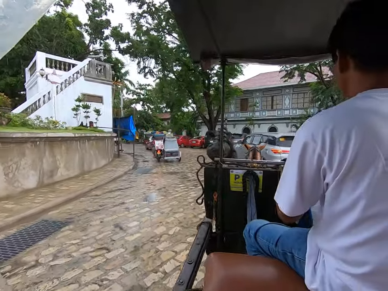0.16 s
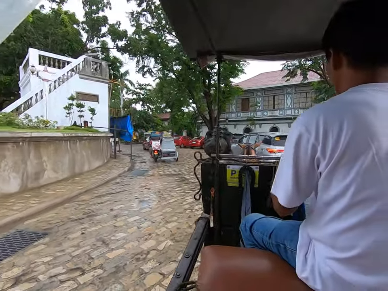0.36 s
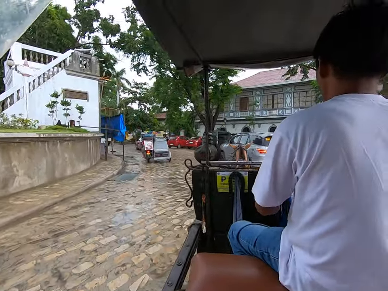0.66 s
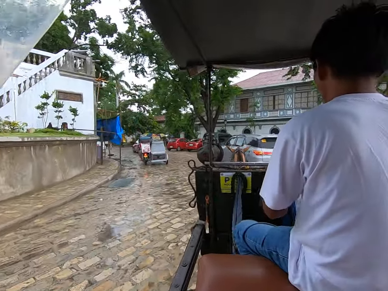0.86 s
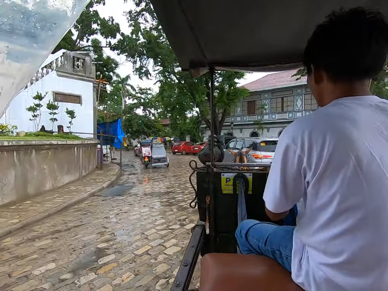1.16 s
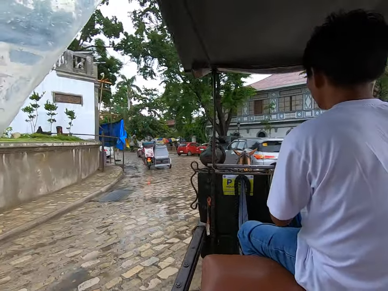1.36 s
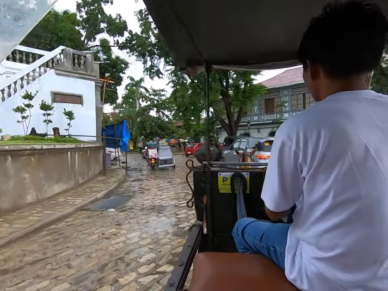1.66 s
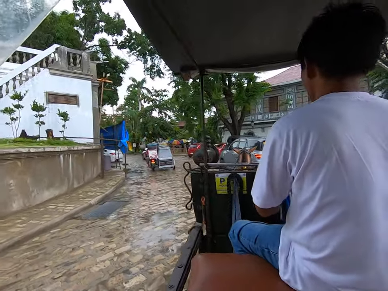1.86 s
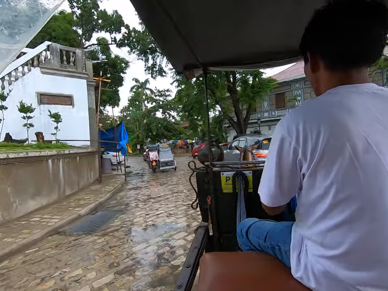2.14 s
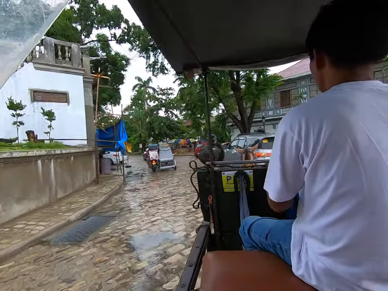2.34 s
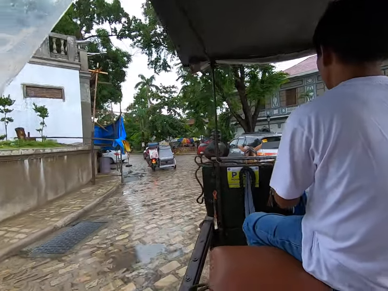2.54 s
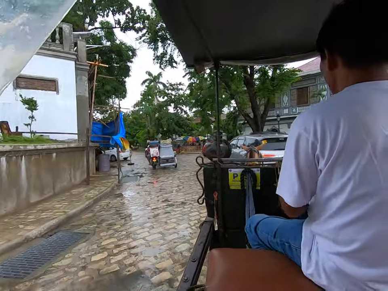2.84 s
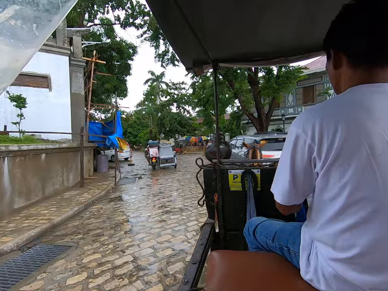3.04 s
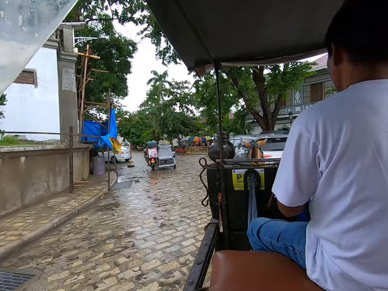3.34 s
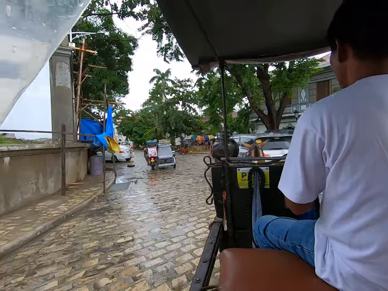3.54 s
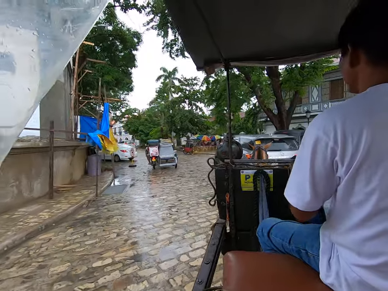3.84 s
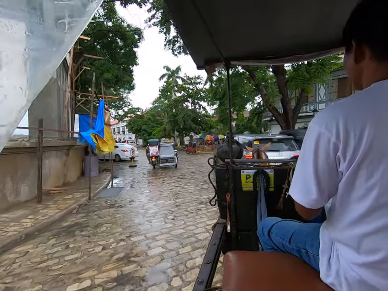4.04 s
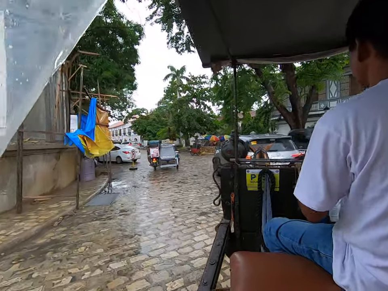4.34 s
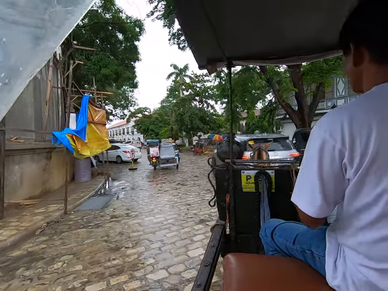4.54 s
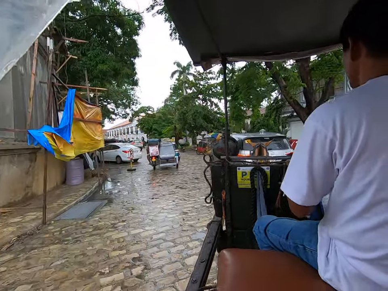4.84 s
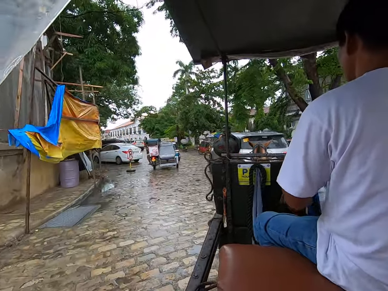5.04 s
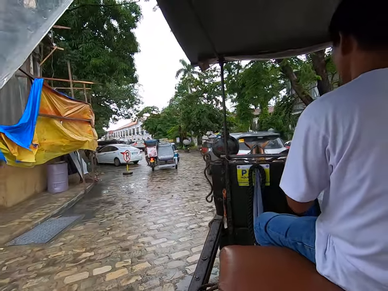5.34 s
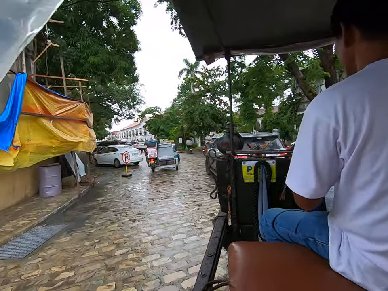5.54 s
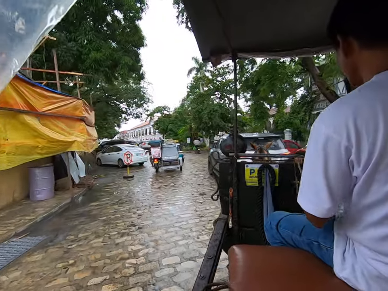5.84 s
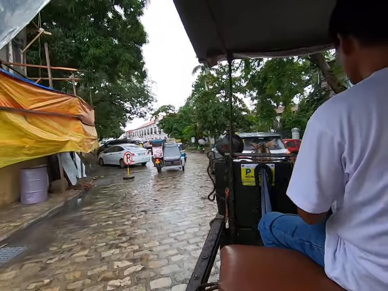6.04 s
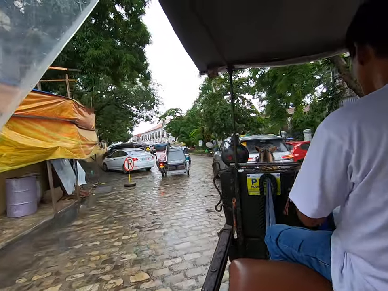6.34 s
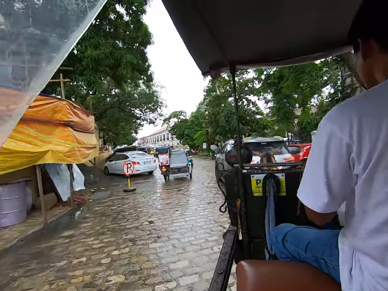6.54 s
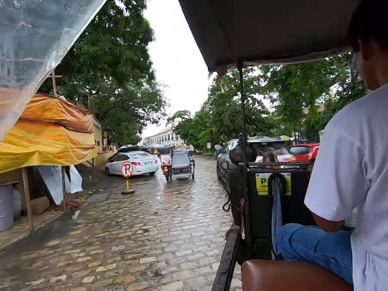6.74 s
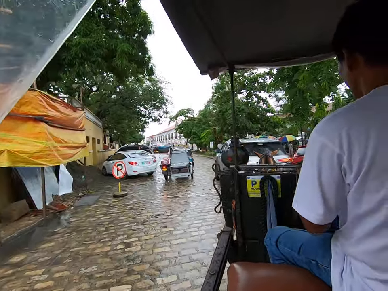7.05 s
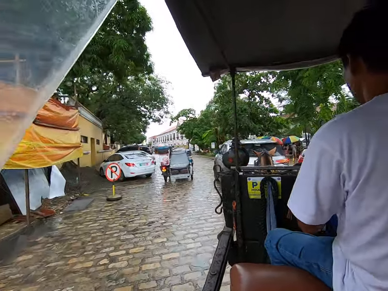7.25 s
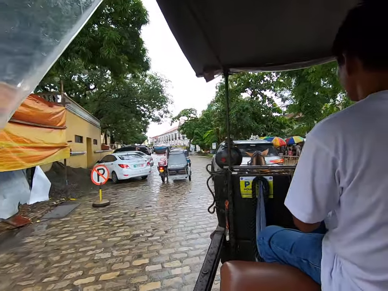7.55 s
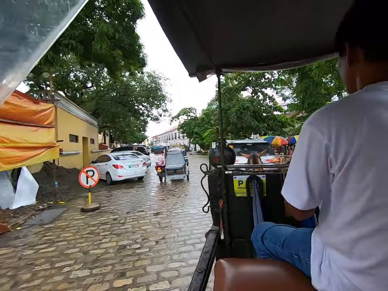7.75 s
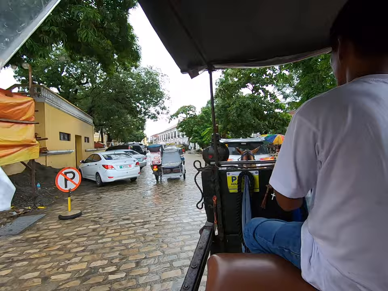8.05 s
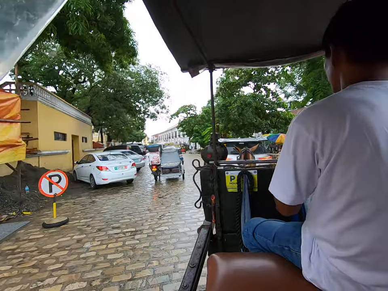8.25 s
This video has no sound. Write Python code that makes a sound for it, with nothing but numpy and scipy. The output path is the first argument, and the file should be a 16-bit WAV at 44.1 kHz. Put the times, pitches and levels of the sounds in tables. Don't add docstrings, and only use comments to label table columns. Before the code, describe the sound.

Onboard a horse cart on a wet cobbled street. Throughout, paired hooves land about every 0.3 seconds: hollow, short clops around 1 to 1.3 kHz with gritty scrape, a shoe crack and uneven strength, often preceded by a lighter touch. A low wooden boom near 100 to 140 Hz rumbles continuously, with creaking planks and irregular thuds, notably at 3.3, 4.2, 4.9 and 7.1 seconds. From 0 to 2.4 the image is wide and bright: wheel hiss, sandy crunch, small splashes, metal ticks, buckle clinks and loose rattles. Between 2.4 and 3.6 it narrows to dull mono; rattles thin out. From 4 a one-cylinder engine emerges, a low putter of roughly 20 to 23 pulses per second with ticking valves, close by 6, speeding slightly until 7.4, then slowing. Faint bearing squeaks come around 5.2, 6.7 to 7.4 and 8. Stereo width begins returning near 7.9, with brightness reopening at the 8.4 end.

```python
import sys
import numpy as np
from scipy import signal
from scipy.fft import rfft, irfft
from scipy.io import wavfile
from scipy.ndimage import uniform_filter1d

SR = 44100
rng = np.random.default_rng(int(sys.argv[2]) if len(sys.argv) > 2 else 0)


def output_pcm(signal):
    pcm = np.clip(np.atleast_2d(signal).T, -1, 1) * 32767
    wavfile.write(sys.argv[1], SR, np.round(pcm).astype(np.int16))


def decibels_to_gain(level_db):
    exponent = np.asarray(level_db, float) / 20
    return 10 ** exponent


N = 370440
TIME = np.arange(N) / SR

# t/s, peak level/dB, cup f/Hz, ring T60/s, grit level re peak/dB
LEFT_BEATS = [(0.247, -16, 1050, 0.024, 9.5), (0.853, -6, 1116, 0.029, -3), (1.428, -7, 1044, 0.029, -10),
              (2.008, -9.5, 1060, 0.037, 2), (2.599, -23, 1020, 0.073, 6.5), (3.194, -17, 1065, 0.023, 2),
              (3.78, -10.5, 1117, 0.032, -12), (4.371, -12.5, 1050, 0.027, -9),
              (4.981, -23, 1110, 0.027, 7), (5.581, -15.5, 1236, 0.045, -10.5),
              (6.19, -8.5, 1350, 0.036, -24), (6.808, -16, 1010, 0.041, 0.5),
              (7.413, -25.5, 1270, 0.061, 3), (8.034, -12, 1310, 0.036, -0.5)]
# t/s, peak level/dB, cup f/Hz, ring T60/s, grit level re peak/dB
RIGHT_BEATS = [(0.549, -20, 1010, 0.041, 3), (1.101, -12, 1370, 0.018, 3.5), (1.715, -7, 1045, 0.047, -24),
               (2.293, -17, 973, 0.053, -3), (2.888, -7, 970, 0.076, -15.5), (3.49, -9, 1260, 0.051, -6.5),
               (4.065, -7, 1050, 0.028, -4.5), (4.665, -18, 1070, 0.029, 3),
               (5.265, -9.5, 1066, 0.031, -28), (5.879, -8.5, 1092, 0.05, -33),
               (6.483, -22, 1430, 0.033, 3), (7.114, -21, 1082, 0.077, -1), (7.724, -10, 1060, 0.045, -1.5),
               (8.32, -30, 965, 0.067, 12)]
# t/s, peak level/dB, cup f/Hz
TOUCHES = [(0.211, -22, 1580), (0.222, -19.5, 1270), (0.53, -24, 1405), (0.769, -26, 1350),
           (0.807, -21, 1400), (1.391, -17.5, 1420), (1.645, -30.5, 1000), (1.688, -15.5, 1780),
           (1.698, -11, 1340), (1.977, -15.5, 1320), (2.274, -21.5, 1280), (2.41, -26, 1210),
           (2.573, -18.5, 1430), (2.861, -20.5, 1500), (3.164, -20, 1330), (3.456, -23.5, 1520),
           (3.74, -16.5, 1260), (4.048, -18, 1500), (4.344, -23.5, 1250), (4.643, -17.5, 1320),
           (4.933, -23, 1280), (5.859, -16, 1055), (6.09, -28.5, 1060), (6.161, -20.5, 1175),
           (6.212, -22, 1310), (6.777, -22, 1360), (7.095, -17, 870), (7.239, -19, 930), (8.022, -20, 1470)]
TOUCH_T60 = 0.029
USUAL_DB = -18
GRIT_DB, GRIT_SLOPE = 2, -0.4
CRACK_DB, CRACK_SLOPE = -7, -0.067
SEAL, SEAL_S = 0.07, 0.008
WALL_SPREAD = 0.14

# t/s, peak level/dB, board f/Hz
JOLTS = [(0.194, -19, 174.5), (0.656, -18, 233), (0.921, -22, 250), (0.985, -26, 246), (1.156, -21.5, 248),
         (1.84, -15, 398), (2.597, -14.5, 250), (3.288, -11, 216), (3.294, -16, 422), (3.716, -25, 234),
         (4.202, -3, 187), (4.484, -13, 277), (4.989, -21, 430), (5.239, -23.5, 413), (5.356, -24, 408),
         (5.69, -13, 157), (5.825, -23, 223), (6.362, -13.5, 316), (6.365, -15, 411), (6.752, -23, 229),
         (7.106, -7, 313), (7.24, -18, 450), (7.493, -13.5, 183), (7.88, -16, 178), (7.883, -16.5, 474),
         (8.197, -23, 229)]
# t/s, peak level/dB, f/Hz
LURCHES = [
    (1.0, -28, 104),
    (1.17, -13, 109),
    (2.85, -34, 99),
    (4.92, -12, 126),
    (5.24, -17, 147),
    (5.33, -15.5, 144),
    (5.42, -18, 156),
    (5.8, -17, 148),
    (5.9, -20, 145),
    (7.05, -27, 200),
]
# t/s, peak level/dB, f/Hz
KNOCKS = [(0.124, -27.5, 476), (0.653, -24, 697), (1.017, -27, 509), (1.158, -28, 523), (1.652, -33, 550),
          (2.176, -36, 493), (2.576, -25, 487), (3.084, -28, 506), (3.817, -23, 495), (3.857, -30, 592),
          (3.933, -28, 486), (4.682, -28, 519), (5.105, -34, 577), (5.541, -31, 498), (6.321, -21, 468),
          (7.613, -30, 550), (7.923, -27, 522)]
BOARD_T60, BOARD_HZ = 0.073, 250
HARD_DAMPS = -0.21

# t/s, level/dB
ROUGHNESS = [(0.0, -1), (0.42, 1), (0.91, -0.5), (1.15, 2), (1.5, 0), (1.64, 1.5), (2.08, -2.5),
             (2.59, 1.5), (4.54, 1), (5.15, 2.5), (5.69, 0), (6.25, 1), (6.85, 1), (7.72, 1), (8.4, -0.5)]
# f/Hz, level per Hz/dB
BOOM = [(8.8, -40), (15, -6.5), (43, -9.5), (91, 0), (107, 0.5), (140, 1), (173, -17.5), (211, -13),
        (300, -20.5), (390, -77), (660, -120)]
# f/Hz, level per Hz/dB
BOARDS = [(110, -61), (190, -22), (248, -2), (392, -9), (511, -5.5), (780, -14.5), (1120, -11.5),
          (1700, -29.5), (2210, -28.5), (3740, -120)]
# f/Hz, level per Hz/dB
HISS = [(880, -11), (1500, 0.5), (1770, -3.5), (2590, -4.5), (3260, -3.5), (4390, -8), (6640, -14),
        (9550, -21), (10800, -21.5), (12500, -25), (14100, -27), (16000, -34.1)]
BODY = -23, 1, 3, 0.25
PLANKS = -37.5, 1.44, 0, 0.31
SPRAY = -39, 2, -7.5, 1.17
DRY_FROM_S, DRY_BY_S = 2.07, 2.51

# f/Hz, T60/s, level/dB
GRAIN_MODES = [(1050, 0.022, 0), (1540, .016, -3), (2330, 0.014, -8), (3183, 0.018, 12), (3990, 0.014, -1),
               (4660, 0.016, -10), (6000, .012, -6.5), (8650, 0.017, -10)]
# start t/s, length/s, level/dB, centre f/Hz
SPLASHES = [(0.251, 0.19, -45, 6440), (0.502, 0.071, -49, 6000), (0.685, 0.067, -42, 6000),
            (0.852, 0.067, -49, 7000), (1.123, 0.08, -45.5, 8550), (1.19, .06, -47.5, 7500),
            (1.271, .045, -43, 7460), (1.333, 0.1, -46, 8000), (1.651, 0.047, -46.5, 7560),
            (1.77, .1, -44.5, 9100), (1.906, .12, -45, 7040), (2.032, 0.056, -53.5, 8000),
            (2.334, 0.13, -49, 7500), (8.31, .05, -51.5, 8000)]
# t/s, peak level/dB, centre f/Hz
SCUFFS = [(0.363, -23, 2360), (0.5301, -22, 1390), (1.1208, -21, 1390), (1.2084, -29, 918),
          (1.7786, -26, 1480), (2.9756, -26, 1490), (3.0522, -32, 1070), (3.1123, -35, 1060),
          (3.8294, -31, 1100), (3.8994, -35, 2060), (4.1959, -25, 1230), (4.7494, -27, 910),
          (5.3194, -28, 1130), (5.963, -23.5, 1150), (6.4662, -28, 1410), (6.5415, -31, 966),
          (7.3714, -28, 1210), (7.7023, -22, 1110), (8.1884, -27, 1940), (8.239, -29, 1940)]

# t/s, peak level/dB, centre f/Hz
RATTLES = [(0.245, -19.5, 3560), (0.3308, -30.5, 3620), (0.528, -28, 3000), (0.728, -36, 4800),
           (0.8173, -27, 3650), (0.85, -26, 4580), (1.0997, -23.5, 3310), (1.1505, -21.5, 3560),
           (1.1982, -34, 4860), (1.279, -35.5, 4850), (1.338, -26.5, 3950), (1.4, -18.5, 2600),
           (1.689, -20.5, 3300), (1.8326, -23, 3600), (1.9705, -24, 3230), (2.167, -33, 5800),
           (2.274, -29.5, 3300), (2.3578, -28.5, 3540), (2.4133, -28.5, 3640), (2.601, -25.5, 3600),
           (2.8707, -25.5, 3260), (3.219, -27, 3720), (3.488, -25, 4660), (3.5597, -29, 3590),
           (3.8952, -25.5, 3940), (4.192, -24, 4700), (4.701, -24, 3460), (6.19, -20, 3400),
           (7.095, -18, 3460), (8.378, -32, 3450)]
# t/s, peak level/dB
SHIVERS = [(1.501, -37), (1.915, -49), (2.5476, -55), (2.9945, -39.5), (3.1675, -47), (3.1934, -39),
           (3.454, -37), (3.7374, -51), (4.0537, -37), (4.344, -41), (4.634, -40), (4.974, -35),
           (5.1677, -38), (5.2997, -40), (5.5806, -37), (5.8736, -48), (6.3566, -42), (6.759, -53),
           (7.2394, -49), (7.72, -32), (8.032, -43), (8.3192, -39)]
SHIVER_HZ, SHIVER_DB = 6000, 4.5
# t/s, peak level/dB, f/Hz, T60/s
CLINKS = [
    (0.071, -25, 3280, 0.034),
    (0.61, -27.5, 3810, 0.055),
    (0.816, -31, 3665, 0.091),
    (1.666, -25.5, 4070, 0.074),
    (2.379, -24, 9020, 0.031),
    (3.5249, -23, 3470, 0.056),
    (5.1687, -39, 3900, 0.07),
    (6.662, -50, 4500, 0.066),
    (7.3652, -31, 3820, 0.07),
]
# t/s, peak level/dB, centre f/Hz
TICKS = [(0.0722, -34, 3560), (0.246, -19, 3500), (0.2972, -28.5, 4030), (0.376, -26, 5170),
         (0.5295, -18, 4730), (0.6474, -33.5, 4060), (0.6974, -32, 6140), (0.85, -23, 4750),
         (1.1025, -17, 3600), (1.1318, -25.5, 4950), (1.1533, -14, 3730), (1.385, -19.5, 4400),
         (1.5554, -29, 3820), (1.5934, -32.5, 4180), (1.6304, -35.5, 3680), (1.69, -18.5, 4930),
         (1.714, -33, 5610), (1.8352, -27, 3800), (1.971, -34.5, 6440), (2.1674, -23, 6060),
         (2.3376, -40, 3820), (2.4224, -37, 3730)]
TICK_T60, TICK_RING_DB = 0.012, -6

# start t/s, end t/s, f/Hz, level/dB
WHINES = [
    (5.13, 5.224, 4900, -49),
    (6.65, 6.72, 4100, -46),
    (6.84, 6.92, 4150, -50),
    (6.99, 7.05, 4070, -41),
    (7.29, 7.38, 4050, -50),
    (8.0, 8.22, 3090, -44),
    (3.62, 3.68, 6330, -71),
]

# t/s, exhaust level/dB
ENGINE = [
    (4.0, -60),
    (4.4, -32.5),
    (5.4, -29.5),
    (5.9, -25),
    (6.7, -24),
    (7.4, -24.5),
    (8.4, -23),
]
# t/s, firings per s/Hz
FIRING = [
    (5.8, 20.5),
    (6.05, 22.04),
    (6.3, 22.53),
    (7.1, 23.24),
    (7.45, 23.31),
    (7.65, 22.58),
    (7.85, 21.2),
    (8.05, 20.54),
    (8.4, 20.28),
]
# order, level/dB
EXHAUST = [(2, -13), (3, -18), (4, -8), (5, 0), (6, -.6), (7, -9), (8, -20), (9, -22), (10, -21), (11, -14),
           (12, -21)]
# f/Hz, T60/s, level/dB
VALVE = [(3650, .014, 0), (3900, .012, -2), (4150, .012, -3), (3350, .012, -3), (3000, .011, -3),
         (8200, .01, -14)]

# f/Hz, side level re mid/dB
WIDTH = [(60, -11), (110, -19), (190, -16), (330, -12), (590, -6), (1050, -1), (2400, -2), (4000, -10),
         (5500, 0), (10400, 0)]
# f/Hz, share of mid heard as left minus right
LEAN = [(2000, -0.0091), (4000, -.08), (8000, .2), (12000, .3)]
# f/Hz, level/dB
MICROPHONE = [(9500, 0), (10550, -1.5), (10900, -7), (14000, -11), (15500, -18)]
# t/s, share of the dull colour 0-1, side level/dB
WIND_MODE = [
    (0, 0.11, -2.5),
    (2.3, 0.03, 1.5),
    (2.46, 0.42, -7),
    (2.7, 0.72, -18.5),
    (3.6, 0.81, -56),
    (7.85, 1, -58),
    (7.95, 1, -25),
    (8.25, 1, -11.5),
    (8.4, 0.2, -9.5),
]
# f/Hz, level/dB
DULL = [(1500, -2), (4200, -5), (4900, -8), (5600, -17), (7000, -12), (8500, -7), (11000, -9), (12500, 2.5),
        (14000, -2)]
# f/Hz, level/dB
LEAK = [(3500, -83), (4500, -28), (10600, -35), (11500, -4), (15000, 0)]
LIMIT = 0.62


def evened(x):
    return x / np.sqrt(np.mean(x ** 2) + 1e-20)


def read(points, hz):
    f, value = np.transpose(points)
    return np.interp(np.log(hz + 1), np.log(f + 1), value)


def column(rows, index, t=TIME):
    rows = np.array(rows)
    return np.interp(t, rows[:, 0], rows[:, index])


def add(mix, s, sound):
    part = mix[..., round(s * SR):][..., :sound.shape[-1]]
    part += sound[..., :part.shape[-1]]


def ring(hz, t60, t):
    return np.sin(2 * np.pi * hz * t) * decibels_to_gain(-60 * t / t60)


def band(x, lo_hz, hi_hz):
    sos = signal.butter(2, [lo_hz, min(hi_hz, SR / 2.2)], "band", fs=SR, output="sos")
    return signal.sosfilt(sos, x)


def noise(points, size, patchy_db, flicker_db):
    frames, hz = N // (size // 4) + 5, np.fft.rfftfreq(size, 1 / SR)
    draw = rng.standard_normal((frames, len(hz), 5)).T
    patches = uniform_filter1d(uniform_filter1d(draw[4], size=8, axis=0), size=14, axis=1)
    flicker = evened(uniform_filter1d(rng.standard_normal(frames), size=5))
    level = read(points, hz)[:, None] + patchy_db * evened(patches) + flicker_db * flicker
    z = (draw[:2] + 1j * draw[2:4]) * decibels_to_gain(level)
    return evened(signal.istft(z, nperseg=size, noverlap=size - size // 4)[1][:, :N])


def echoes(x, t60, wet_db, spacing):
    taps = np.zeros((2, SR // 2))
    slots = np.arange(40, SR // 2 - spacing, spacing)
    at = slots + rng.integers(0, spacing, (2, len(slots)))
    np.put_along_axis(taps, at, rng.choice([-1., 1.], at.shape), 1)
    taps *= decibels_to_gain(-60 * np.arange(SR // 2) / SR / t60)
    taps *= decibels_to_gain(wet_db) / np.linalg.norm(taps, axis=1, keepdims=True)
    return signal.fftconvolve(x, taps, axes=1)[:, :N]


def hooves():
    out, t = np.zeros((2, N)), np.arange(round(0.12 * SR)) / SR
    touches = [(s, db, hz, TOUCH_T60, GRIT_DB + GRIT_SLOPE * (db - USUAL_DB)) for s, db, hz in TOUCHES]
    falls = LEFT_BEATS + RIGHT_BEATS + touches
    rise = 1 - np.exp(-t / 0.0029)
    sealing = t + SEAL * SEAL_S * (1 - np.exp(-t / SEAL_S))
    for (s, db, hz, t60, grit_db), luck in zip(falls, rng.random((len(falls), 8))):
        wall = 1 + WALL_SPREAD * (luck[1:4] - 1 / 2)
        cup = ring(hz, t60, sealing)
        cup += 0.6 * ring(1.128 * hz * wall[0], 0.91 * t60, t)
        cup += 0.4 * ring(0.814 * hz * wall[1], 0.5 * t60, t)
        cup += 0.15 * ring(5.7 * hz * wall[2], 0.13 * t60, t)
        slaps = np.zeros((2, round(0.03 * SR)))
        slaps[:, 0] = 1, np.sign(luck[0] - 1 / 2)
        returns = (luck.reshape(2, 4) * 0.02 * SR + 60).astype(int)
        np.put_along_axis(slaps, returns, [0.3, -0.25, 0.19, -0.33], 1)
        cup = signal.fftconvolve((cup * rise)[None], slaps, axes=1)[:, :len(t)]
        grind, snap, shake = rng.standard_normal((3, 2, len(t)))
        judder_db = 3 * evened(uniform_filter1d(shake[0], size=120)) * np.clip(t / 0.012 - 1 / 2, 0, 1)
        cup = cup * decibels_to_gain(judder_db)
        grit = evened(band(grind, 0.72 * hz, 1.8 * hz)) * decibels_to_gain(grit_db - 9.5 - 60 * t / (1.72 * t60))
        crack = band(snap, 1500, 5740) * (decibels_to_gain(-60 * t / 0.035) + 0.2 * decibels_to_gain(-60 * t / 0.48))
        crack = crack * decibels_to_gain(CRACK_DB + CRACK_SLOPE * (db - USUAL_DB) - 4.5)
        add(out, s - 0.0015, decibels_to_gain(db) * (cup + rise * (grit + crack)))
    return out + echoes(out, 0.52, wet_db=-13, spacing=24)


def jolts():
    out, t = np.zeros((2, N)), np.arange(round(0.2 * SR)) / SR
    for s, db, hz in JOLTS + LURCHES + [(s, db + 0.5, hz) for s, db, hz in KNOCKS]:
        t60 = BOARD_T60 * np.sqrt(BOARD_HZ / hz) * decibels_to_gain(HARD_DAMPS * (db - USUAL_DB))
        knock = ring(hz, t60, t)
        knock += 0.5 * ring(1.45 * hz, 0.93 * t60, t)
        knock += 1.2 * ring(0.564 * hz, 0.44 * t60, t)
        add(out, s - 0.002, decibels_to_gain(db + 5.5) * knock * (1 - np.exp(-t / 0.0071)))
    return out


def rolled(level_db, follow, dry_db, drift_db):
    dried = np.clip((TIME - DRY_FROM_S) / (DRY_BY_S - DRY_FROM_S), 0, 1)
    drift = drift_db * np.maximum(TIME - DRY_BY_S, 0)
    return level_db + follow * column(ROUGHNESS, index=1) + dry_db * dried + drift


def rolling():
    boom = noise(BOOM, size=4096, patchy_db=1.45, flicker_db=-1.26) * decibels_to_gain(rolled(*BODY))
    boards = noise(BOARDS, size=1024, patchy_db=1.1, flicker_db=0.9) * decibels_to_gain(rolled(*PLANKS) + 0.5)
    hiss = noise(HISS, size=512, patchy_db=2.1, flicker_db=1.6)
    low = signal.sosfiltfilt(signal.butter(4, 5000, fs=SR, output="sos"), hiss)
    fizz = (hiss - low) * decibels_to_gain(-0.16 * TIME)
    return boom + boards + (low + fizz) * decibels_to_gain(rolled(*SPRAY) + 0.5)


def rattles():
    out, t = np.zeros((2, N)), np.arange(round(0.1 * SR)) / SR
    for s, db, hz in RATTLES + [(s, db + SHIVER_DB, SHIVER_HZ) for s, db in SHIVERS]:
        snap, wide = rng.standard_normal((2, 2, len(t)))
        slow, bright = rng.uniform(0.6, 1.5, 2)
        onset = 1 - np.exp(-(t / (0.007 * slow)) ** 2)
        chatter = decibels_to_gain(3.94 * evened(uniform_filter1d(rng.standard_normal(len(t)), size=90)))
        knock = band(snap, 0.27 * hz, 1.18 * hz)
        knock += 0.25 * bright * band(band(wide, 2500, 11000), 2000, 12500)
        add(out, s - 0.002, decibels_to_gain(db + 4.5 - 60 * t / 0.088) * onset * chatter * knock)
    for s, db, hz, t60 in CLINKS:
        add(out, s, decibels_to_gain(db - 2) * ring(hz, t60, t) * (1 - np.exp(-t / 0.0021)))
    return out + echoes(out, 0.029, wet_db=-10, spacing=24)


def ticks():
    out, t = np.zeros((2, N)), np.arange(round(0.06 * SR)) / SR
    for s, db, hz in TICKS:
        snap = band(rng.standard_normal((2, len(t))), 0.37 * hz, 1.36 * hz)
        snap = evened(band(snap, 1500, 10500)) * decibels_to_gain(-60 * t / TICK_T60)
        tone = decibels_to_gain(TICK_RING_DB) * ring(hz, 2.5 * TICK_T60, t)
        add(out, s - 0.0005, decibels_to_gain(db - 5) * (snap + tone))
    return out


def crunch():
    out, t = np.zeros((2, N)), np.arange(round(0.025 * SR)) / SR
    for hz, t60, db in GRAIN_MODES:
        for detune in rng.uniform(0.896, 1.0, 3):
            grains = rng.random(N) < 500 / SR / 18
            touch = grains * decibels_to_gain(3.5 * np.minimum(rng.exponential(1, N), 4))
            rung = signal.oaconvolve(touch, decibels_to_gain(db) * ring(hz * detune, t60, t))[:N]
            out += rung * [[1], [rng.choice([-1, 1])]]
    return evened(out) * decibels_to_gain(rolled(*SPRAY) - 9.5)


def splashes():
    out = np.zeros((2, N))
    for s, length, db, hz in SPLASHES:
        drops, lumps = rng.standard_normal((2, 2, SR // 4))
        spray = evened(band(band(drops, 0.57 * hz, 1.45 * hz), 0.61 * hz, 1.14 * hz))
        spray = spray * decibels_to_gain(2.8 * evened(uniform_filter1d(lumps[0], size=200)))
        spray = spray[:, :round(length * SR)]
        add(out, s, decibels_to_gain(db) * spray * signal.windows.tukey(spray.shape[1], 0.7))
    return out


def scuffs():
    out, t = np.zeros((2, N)), np.arange(round(0.06 * SR)) / SR
    for s, db, hz in SCUFFS:
        scrape = evened(band(rng.standard_normal((2, len(t))), 0.64 * hz, 1.26 * hz))
        add(out, s - 0.002, decibels_to_gain(db - 3 - 60 * t / 0.047) * scrape * (1 - np.exp(-t / 0.0025)))
    return out


def axle():
    out = np.zeros((2, N))
    for start, end, hz, db in WHINES:
        waver = evened(uniform_filter1d(rng.standard_normal(round((end - start) * SR)), size=300))
        tone = np.sin(2 * np.pi * np.cumsum(hz * (1 + 0.0029 * waver)) / SR)
        add(out, start, decibels_to_gain(db) * tone * signal.windows.tukey(len(tone), 0.4))
    return out


def engine():
    turns = np.cumsum(column(FIRING, index=1)) / SR
    turns = np.maximum(turns - turns[round(5.8 * SR)] + 40.608, 0)
    cycle = turns.astype(int)
    near_db = column(ENGINE, index=1)
    strength = decibels_to_gain(-0.5 * rng.standard_normal((3, 100))[:, cycle])
    pipe = -sum(decibels_to_gain(db) * np.cos(2 * np.pi * k * (turns - 1 / 4)) for k, db in EXHAUST)
    pipe = evened(pipe) * uniform_filter1d(strength[0], size=600) * decibels_to_gain(near_db)
    first, second = np.diff(np.floor([turns, turns - 0.17]), axis=1, append=100) == 1
    puff = np.exp(-(turns % 1) / 0.25) * rng.standard_normal(N)
    blows = first * strength[1] ** 2 + 0.45 * second * strength[2] + 0.06 * puff
    t = np.arange(round(0.03 * SR)) / SR
    share = decibels_to_gain(3.5 * rng.standard_normal((len(VALVE), 100))[:, cycle])
    taps = np.zeros(N)
    for part, (hz, t60, db) in zip(share, VALVE):
        taps += signal.oaconvolve(blows * part, decibels_to_gain(db) * ring(hz, t60, t))[:N]
    return (pipe + taps * decibels_to_gain(near_db - 9.5)) * [[1], [0.6]]


def scene():
    cart = hooves() + jolts() + rolling() + rattles() + ticks()
    mid, side = cart + crunch() + splashes() + scuffs() + axle() + engine()
    hz = np.fft.rfftfreq(N, 1 / SR)
    side = irfft(rfft(side) * decibels_to_gain(read(WIDTH, hz)) + rfft(mid) * read(LEAN, hz), N)
    return np.array([mid + side, mid - side])


def low_pass(x):
    return signal.sosfilt(signal.butter(12, 15700, fs=SR, output="sos"), x)


def record(dry):
    mid_side = np.array([dry[0] + dry[1], dry[0] - dry[1]]) / 2
    hz, t, (mid, side) = signal.stft(mid_side, SR, nperseg=512, noverlap=384)
    dull_db = read(DULL, hz)[:, None] * column(WIND_MODE, index=1, t=t)
    colour = decibels_to_gain(read(MICROPHONE, hz)[:, None] + dull_db)
    side = side * decibels_to_gain(np.maximum(read(LEAK, hz)[:, None], column(WIND_MODE, index=2, t=t)))
    folded = np.array([mid, side]) * colour
    mid, side = signal.istft(folded, SR, nperseg=512, noverlap=384)[1][:, :N]
    limited = LIMIT * np.tanh(np.array([mid + side, mid - side]) / LIMIT)
    return low_pass(limited)


dry = scene()
out = record(dry)
output_pcm(out)
```